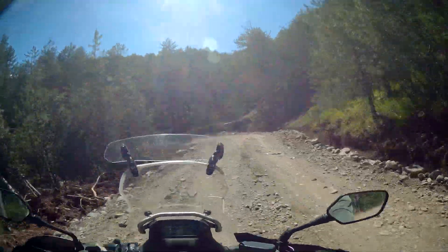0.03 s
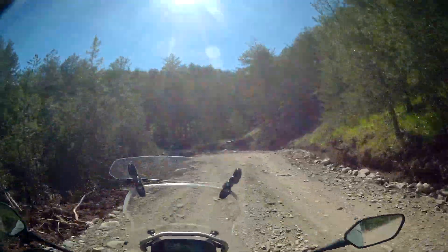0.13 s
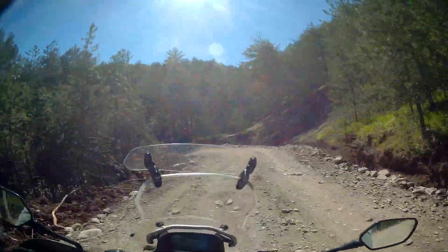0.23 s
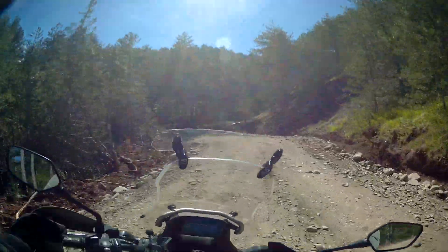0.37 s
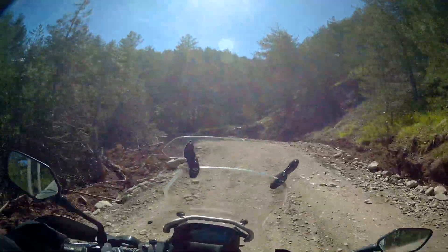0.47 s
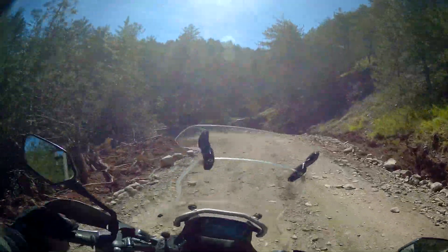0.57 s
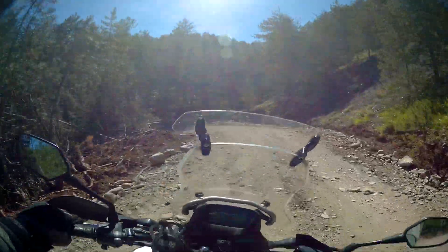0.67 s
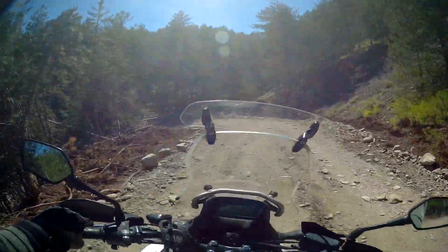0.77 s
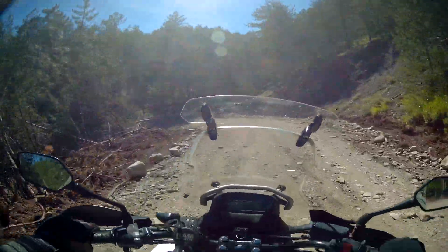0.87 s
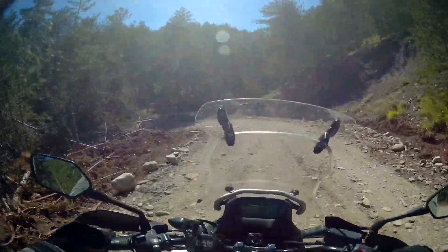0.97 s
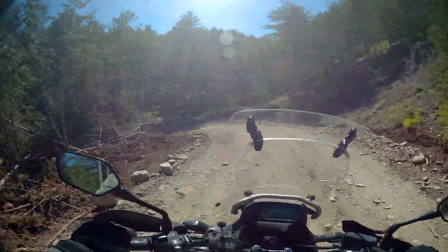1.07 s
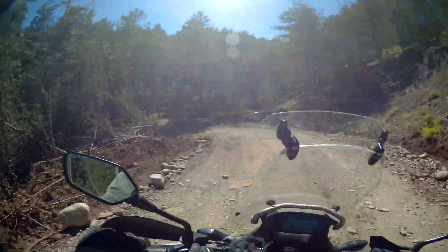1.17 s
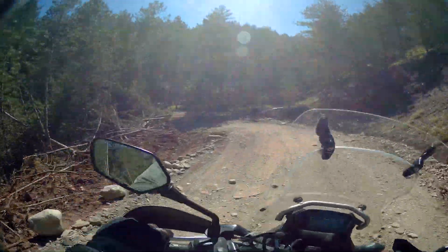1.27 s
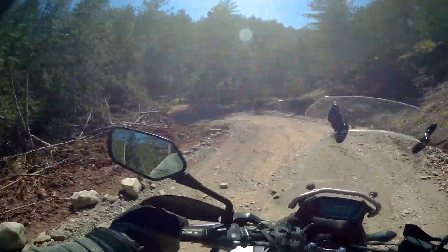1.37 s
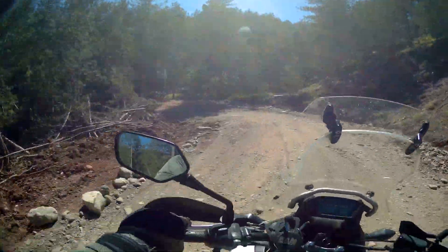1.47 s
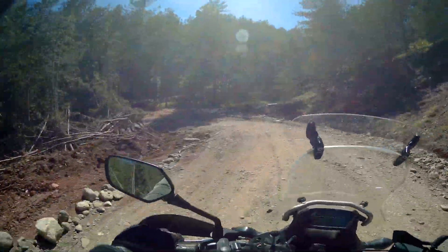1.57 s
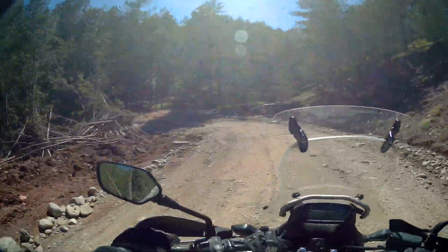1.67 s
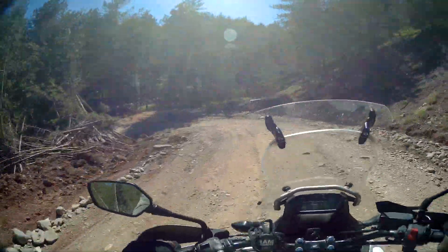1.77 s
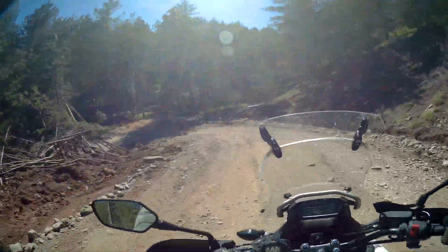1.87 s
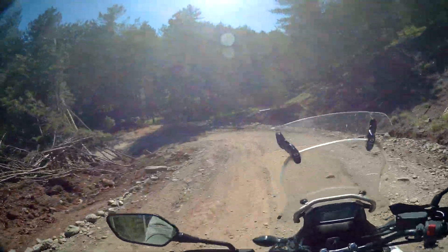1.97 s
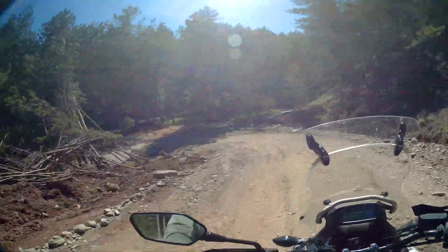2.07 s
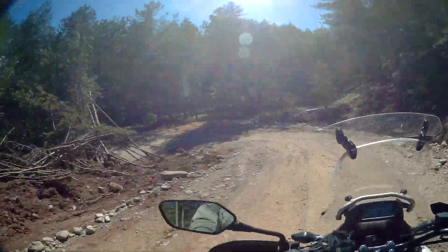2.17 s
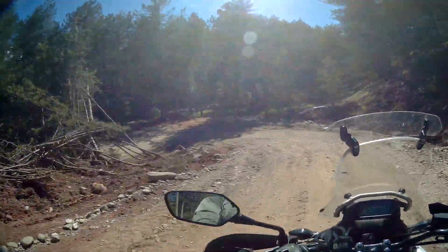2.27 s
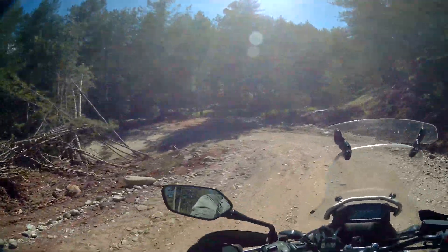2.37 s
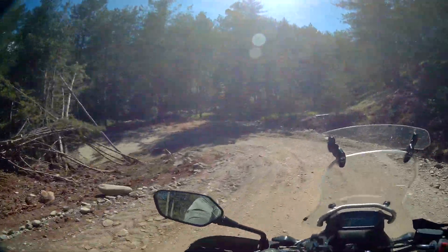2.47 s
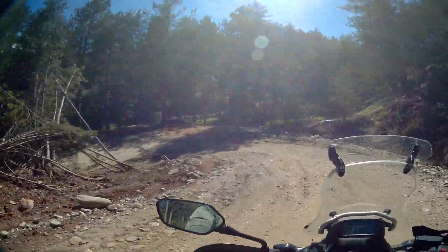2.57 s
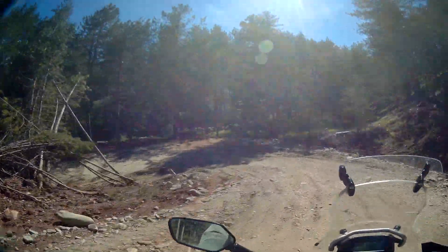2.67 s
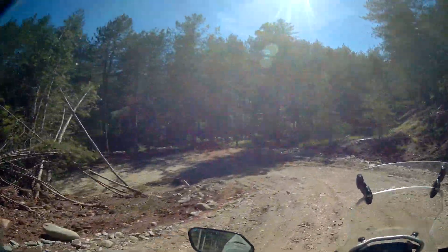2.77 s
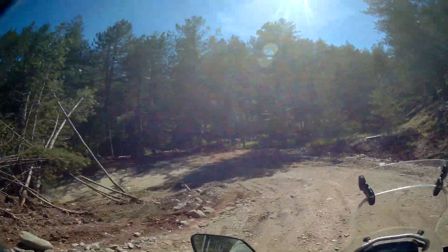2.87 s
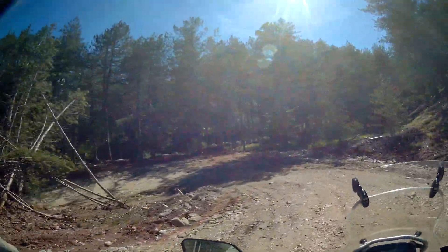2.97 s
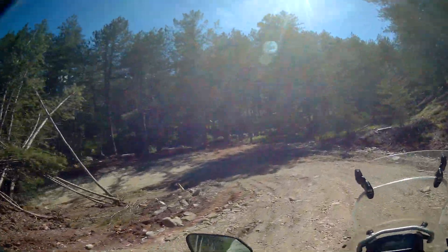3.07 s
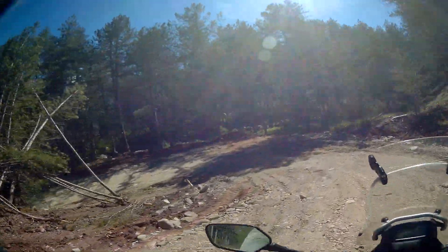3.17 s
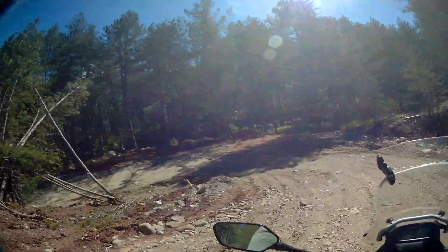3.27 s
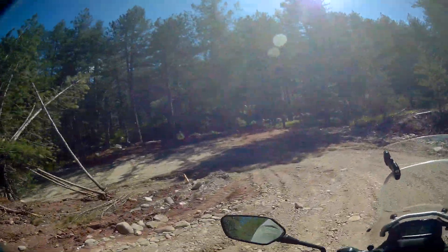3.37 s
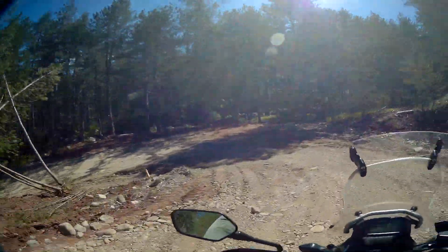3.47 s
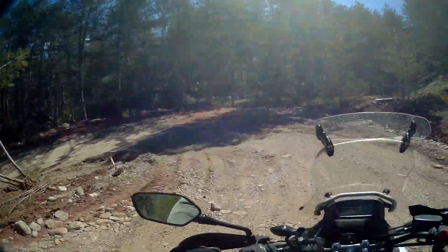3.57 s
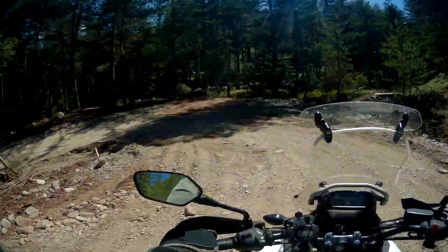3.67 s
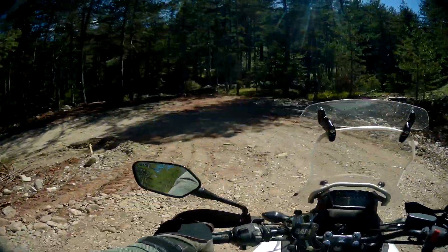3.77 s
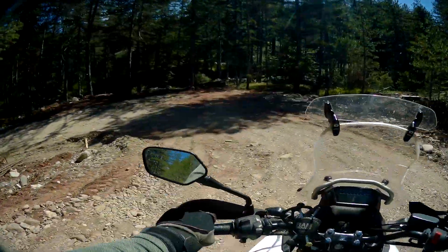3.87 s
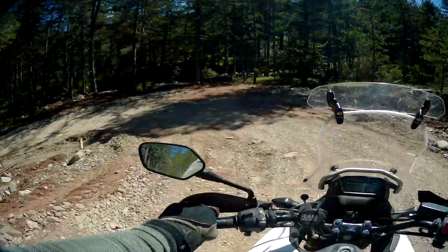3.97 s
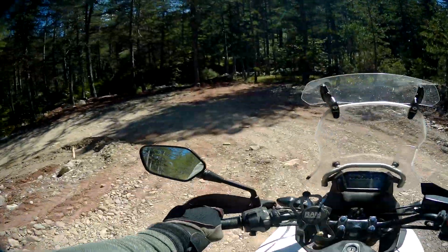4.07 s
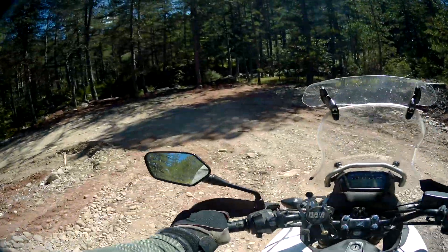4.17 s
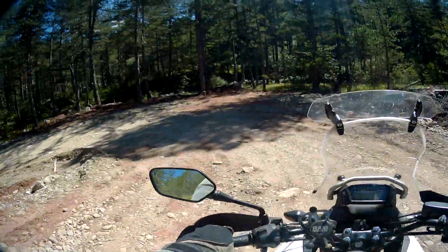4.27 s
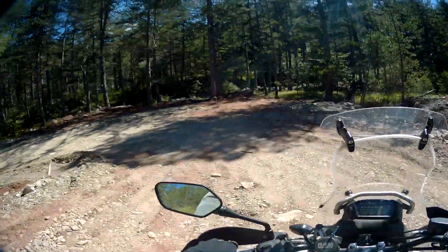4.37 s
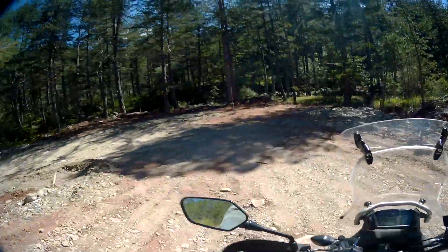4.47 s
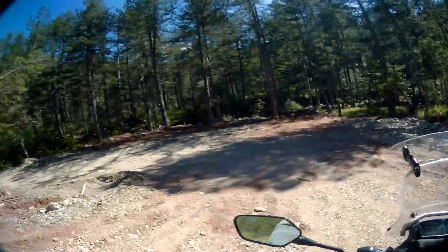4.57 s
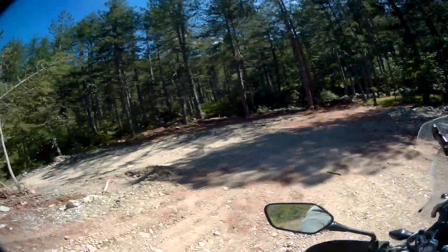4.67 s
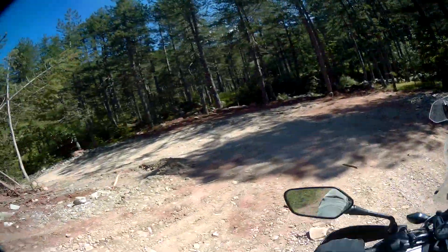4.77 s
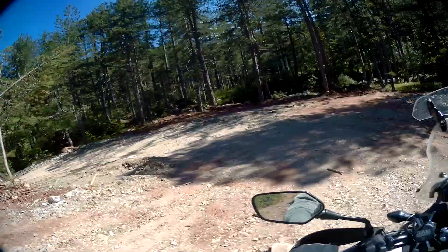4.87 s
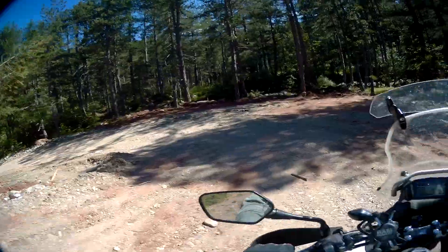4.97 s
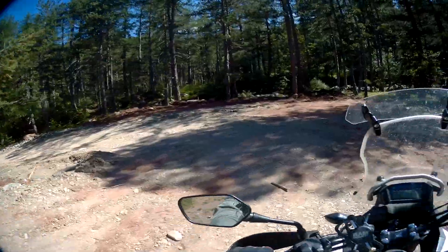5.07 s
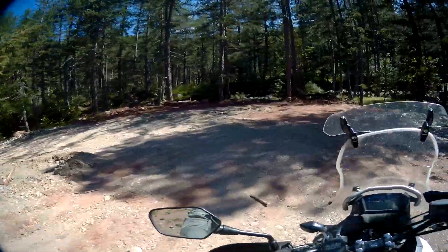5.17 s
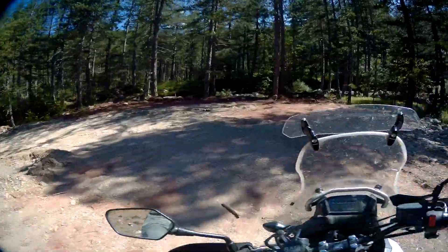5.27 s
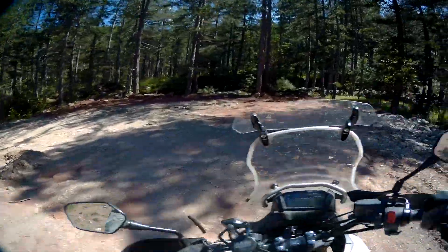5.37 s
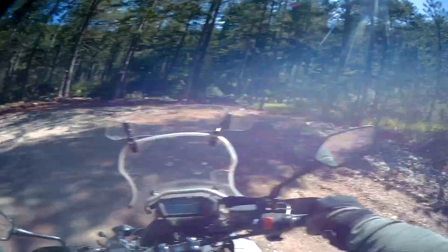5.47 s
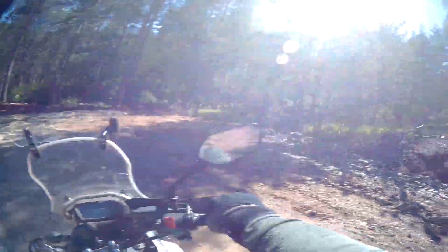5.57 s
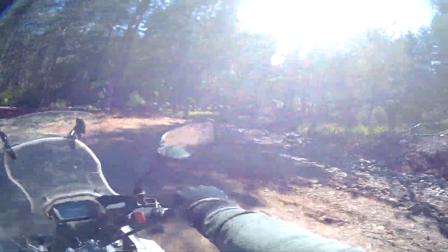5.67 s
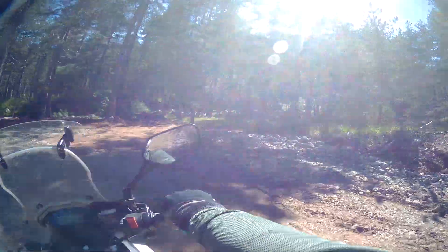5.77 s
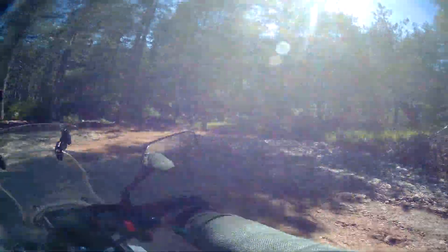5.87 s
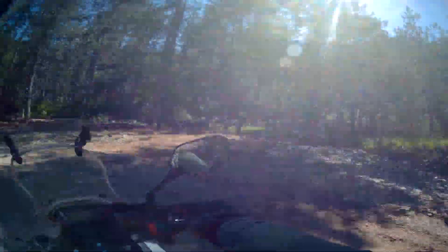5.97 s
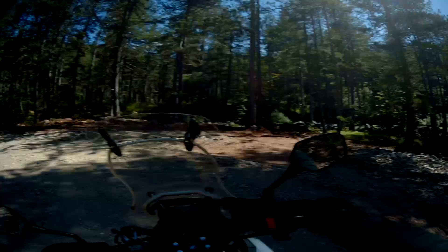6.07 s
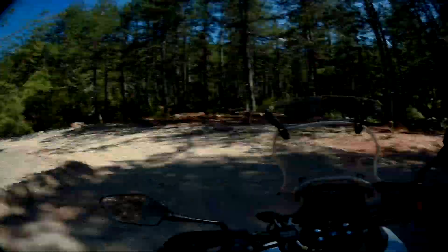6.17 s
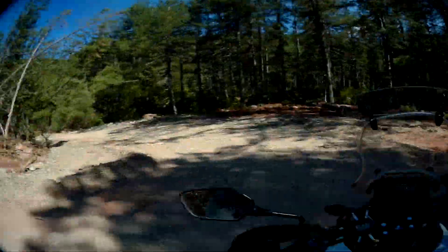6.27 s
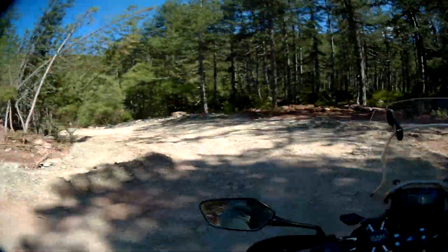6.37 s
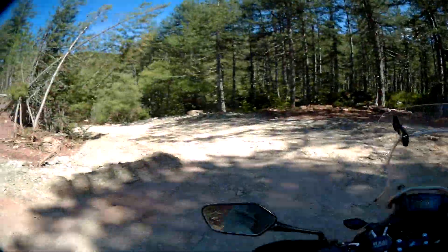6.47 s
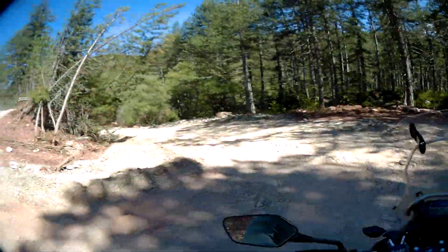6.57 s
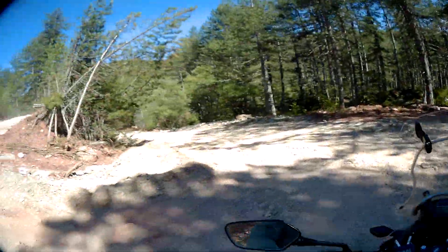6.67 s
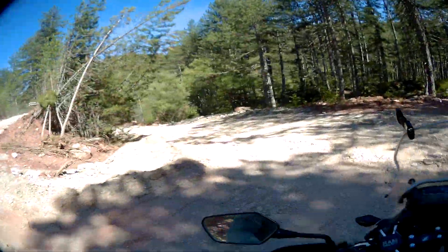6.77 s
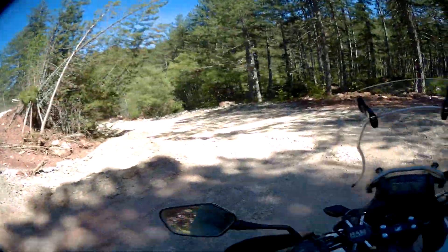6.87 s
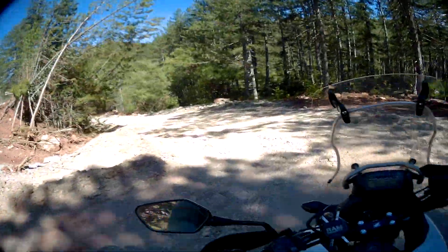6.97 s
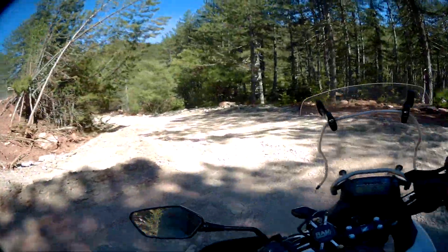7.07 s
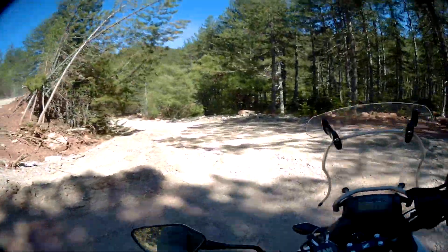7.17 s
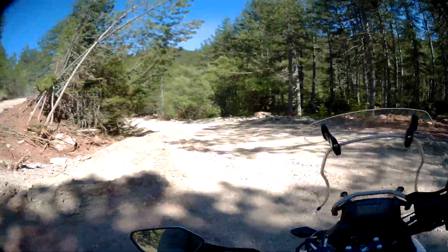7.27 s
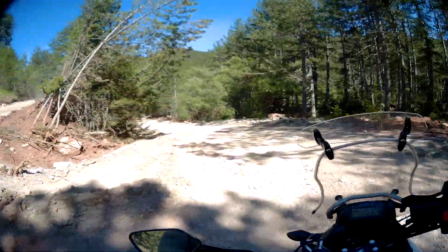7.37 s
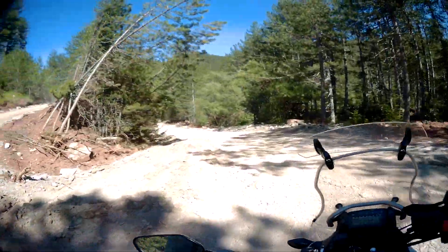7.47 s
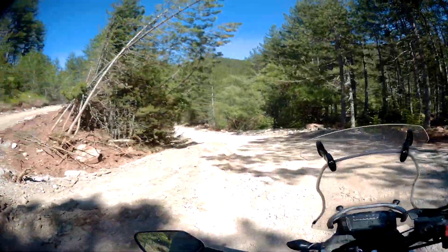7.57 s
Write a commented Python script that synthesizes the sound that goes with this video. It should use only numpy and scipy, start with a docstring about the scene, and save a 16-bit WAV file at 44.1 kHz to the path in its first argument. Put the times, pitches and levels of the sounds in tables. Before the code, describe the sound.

A close, dry, single-channel microphone rides on a motorcycle outdoors. First comes dense stony clatter: dull suspension knocks, sharp metallic stone hits, grit and pebble clicks over a low, fluttering exhaust. Knocks grow sparse and the engine note sinks into uneven separate chugs with soft mechanical ticking and thin whining. Near idle, it becomes quiet, then the engine picks up smoothly and pulls away.

```python
"""A twin-cylinder motorcycle coasts over stony ground, slows to near idle, then opens up and pulls away.
Uneven pairs of firings click into resonant exhaust filters over a harmonic pumping series; noise bursts
sputter, gulp and clatter with the cycle. Random grains make tyre rumble, gravel crunch and pebble clicks.
Timed bursts and short rings make jolts, flung stones, chips and pops; resonated noise makes thin whines
and two brief stone rings. The mix is cut above 15.2 kHz."""
import sys
import numpy as np
from scipy import signal
from scipy.fft import rfft, irfft
from scipy.io import wavfile
from scipy.ndimage import uniform_filter1d

SR = 44100
rng = np.random.default_rng(int(sys.argv[2]) if len(sys.argv) > 2 else 0)


def materialize(psi):
    """Save the field psi as 16-bit PCM at rate SR to the path in sys.argv[1].

    A 1-D psi becomes a single channel; in a 2-D psi each row is a channel.
    """
    bounded = np.clip(np.atleast_2d(psi).T, -1, 1)
    quanta = np.round(bounded * 32767).astype(np.int16)
    wavfile.write(sys.argv[1], SR, quanta)


N = 336483
TIME = np.arange(N) / SR
FIRING_GAP = 3 / 8  # cycles; second cylinder fires 270 crank degrees after the first
OPEN_S = 6.748  # throttle snaps open
CRUISE_RATE_HZ = 20  # reference engine cycle rate
WHINE_WOBBLE_HZ, WHINE_THROB_DB = 25, 4


def amp(db):
    """Decibels to gain."""
    return 10 ** (np.asarray(db) / 20)


def unit(x):
    """Scale to rms 1."""
    return x / np.sqrt(np.mean(x ** 2) + 1e-20)


def curves(rows):
    """Table columns after the first, interpolated linearly in time."""
    s, *columns = np.transpose(rows)
    return [np.interp(TIME, s, column) for column in columns]


def add(mix, s, sound):
    """Mix a sound in at time s."""
    part = mix[max(round(s * SR), 0):][:len(sound)]
    part += sound[:len(part)]


def colour(x, points, size=8192):
    """Causal minimum-phase filter with the given spectrum, unit energy: white noise keeps its level."""
    hz, db = np.transpose(points)
    bin_hz = abs(np.fft.fftfreq(size, 1 / SR))
    log_gain = np.log(amp(np.interp(np.log(bin_hz + 1), np.log(hz), db)))
    spectrum = np.exp(np.conj(signal.hilbert(log_gain)))
    ring = np.fft.ifft(spectrum).real[:size // 2]
    return signal.oaconvolve(x, ring / np.linalg.norm(ring))[:N]


def wander(bandwidth_hz):
    """Slow random drift of rms 1: Gaussian low-passed noise."""
    spectrum = rfft(rng.standard_normal(N))
    rolloff = np.exp(-(np.fft.rfftfreq(N, 1 / SR) / bandwidth_hz) ** 2)
    return unit(irfft(spectrum * rolloff, N))


def resonate(x, hz, width_hz):
    """Double-pole resonance at a fixed or moving frequency, rms 1: shift to 0 Hz, filter, shift back."""
    turn = np.exp(2j * np.pi * np.cumsum(hz * np.ones(N)) / SR)
    r = np.exp(-np.pi * width_hz / SR)
    baseband = signal.lfilter([1], [1, -2 * r, r * r], x / turn + 1e-18)
    return unit((turn * baseband).real)


def puffs(clicks, decay_s):
    """Turn each click into a noise puff of equal energy, its power decaying over decay_s."""
    r = np.exp(-1 / (decay_s * SR))
    power = signal.lfilter([1 - r], [1, -r], clicks ** 2)
    return np.sqrt(power) * rng.standard_normal(N)


def grains(per_s, spread_db):
    """Random clicks of rms 1, most small and a few large."""
    size = amp(spread_db * np.minimum(rng.exponential(1, N), 4))
    sign = rng.choice([-1, 1], N)
    return unit(size * sign * (rng.random(N) < per_s / SR))


def thud(swell_s):
    """Time and envelope of a dull blow that peaks after swell_s."""
    t = np.arange(SR // 15) / SR
    return t, (t / swell_s) ** 2 * np.exp(2 - 2 * t / swell_s)


# engine speed: t/s, four-stroke cycle rate/Hz
ENGINE_SPEED = [(0.0, 25.61), (0.81, 24.19), (1.06, 22.42), (1.61, 20.74), (2.86, 18.99), (3.69, 16.39),
                (3.88, 15.59), (4.54, 13.63), (5.47, 11.65), (5.62, 13.24), (5.84, 10.27), (6.26, 11.64),
                (6.7, 9.44), (6.85, 13.76), (6.98, 13.17), (7.28, 16.23), (7.45, 14.13), (7.63, 17.19)]


def cycles(lead_s=0):
    """Engine cycles completed: integrated speed, looking lead_s ahead."""
    speed_hz, = curves(ENGINE_SPEED)
    return np.cumsum(speed_hz) / SR + lead_s * speed_hz


def strokes(angle, uneven_db, late_s=0):
    """One click per cycle near the given share of the cycle, 3 ms early; mean power 1 before unevenness."""
    whole = np.maximum.accumulate(np.floor(cycles(lead_s=.003 - late_s) - angle))
    at = np.diff(whole, append=whole[-1]) > 0
    speed_hz, = curves(ENGINE_SPEED)
    return at * np.sqrt(SR / speed_hz) * amp(uneven_db * rng.standard_normal(N))


# pipe resonances sink to this share of their pitch as the gas cools at idle
COOL_PITCH, COOL_RATE_HZ, WARM_RATE_HZ = .92, 12.3, 13.6


def pipe(x, points):
    """Coasting pipe: crossfades to lower resonances at low speed as the gas cools."""
    warm = np.interp(curves(ENGINE_SPEED)[0], [COOL_RATE_HZ, WARM_RATE_HZ], [0, 1])
    cool_points = [(hz * COOL_PITCH, db) for hz, db in points]
    return colour(warm * x, points) + colour((1 - warm) * x, cool_points)


# throttle drive while pulling, before the layer offsets: t/s, level/dB
THROTTLE_DRIVE = [(6.76, -29.5), (6.85, -28), (6.93, -35), (7.14, -28), (7.41, -33), (7.47, -28),
                  (7.6, -23.5)]
# coasting levels at CRUISE_RATE_HZ, before the trims in exhaust(), and their growth with speed
PUMP_DB, BOOM_DB, BARK_DB = -29.5, -29.5, -28.5
PUMP_DB_PER_OCTAVE, BOOM_DB_PER_OCTAVE, BARK_DB_PER_OCTAVE = 4, 13.5, 17
BARK_TOP_OCTAVES = 0.048  # bark stops growing this far above CRUISE_RATE_HZ
# extra loss per octave below IDLE_RATE_HZ
IDLE_RATE_HZ, IDLE_PUMP_DB, IDLE_BOOM_DB, IDLE_BARK_DB = 16.7, 28.5, 7, 4
PICKUP_DB, FULL_PICKUP_HZ_PER_S = 13, 20.4  # firings harden as the engine speeds up
SETTLE_S = 0.008  # averaging window of the levels


def exhaust_levels(pulling_pump_db, pulling_boom_db, pulling_bark_db):
    """Pump, boom and bark levels: set by engine speed when coasting, by throttle when pulling."""
    speed_hz, = curves(ENGINE_SPEED)
    throttle_db, = curves(THROTTLE_DRIVE)
    octaves = np.log2(speed_hz / CRUISE_RATE_HZ)
    bark_octaves = np.minimum(octaves, BARK_TOP_OCTAVES)
    idling = np.maximum(np.log2(IDLE_RATE_HZ / speed_hz), 0)
    acceleration = np.gradient(speed_hz) * SR
    pickup_db = PICKUP_DB * np.clip(acceleration / FULL_PICKUP_HZ_PER_S, 0, 1)
    coasting = [PUMP_DB + PUMP_DB_PER_OCTAVE * octaves - IDLE_PUMP_DB * idling,
                BOOM_DB + BOOM_DB_PER_OCTAVE * octaves - IDLE_BOOM_DB * idling + pickup_db,
                BARK_DB + BARK_DB_PER_OCTAVE * bark_octaves - IDLE_BARK_DB * idling + pickup_db]
    pulling = [throttle_db + pulling_pump_db,
               throttle_db + pulling_boom_db,
               throttle_db + pulling_bark_db]
    return uniform_filter1d(np.where(TIME > OPEN_S, pulling, coasting), round(SETTLE_S * SR))


# coasting firings made louder or softer: t/s, level change/dB
FIRING_CHANGES = [(3.758, 2.5), (3.95, -1), (4.02, -2), (4.08, 8.5), (4.21, 1), (4.29, 4), (4.425, 13),
                  (4.57, 9.5), (5.028, 5), (5.447, 11.5)]
# pumping of two pistons 270 degrees apart: multiple of the cycle rate, relative level/dB
PUMP_ORDERS = [(2, -7.5), (3, 2.5), (4, -25.5), (5, -9.5), (6, -24.5)]
# silencer response: f/Hz, relative level/dB
SILENCER_BOOM = [(30, -32), (65, -0.5), (105, 13.5), (130, 7), (170, -2.5), (230, 1.5), (400, -84.5)]
# pipe response, coasting: f/Hz, relative level/dB
COASTING_BARK = [(120, -48.5), (225, -2.5), (265, -9.5), (300, 5.5), (350, 3), (400, -2), (470, -2),
                 (520, -12), (600, -24), (750, -33), (1000, -46), (2000, -93)]
# pipe response, throttle open: f/Hz, relative level/dB
PULLING_BARK = [(120, -47), (215, -0.5), (270, 0), (300, 7.5), (320, 8), (345, 6), (365, -5.5), (400, 0),
                (450, -9.5), (500, -8), (600, -33.5), (1000, -63.5), (2000, -94.5)]
JITTER_S = .00025  # rms firing jitter, coasting
# pumping orders swell as they glide through the silencer's resonance
HUM_HZ, HUM_WIDTH_HZ, HUM_DB = 114.2, 15, 10


def exhaust(first_db, pulling_first_db):
    """Paired gas pulses drive silencer and pipe; coasting, the first of a pair is weak and ragged."""
    pulling = TIME > OPEN_S
    pump_db, boom_db, bark_db = exhaust_levels(
        pulling_pump_db=-13.0, pulling_boom_db=3.5, pulling_bark_db=1.56)
    firing_gain = amp(sum(db * (abs(TIME - s) < .012) for s, db in FIRING_CHANGES))
    uneven_db = np.where(pulling, .5, 1)
    late_s = JITTER_S * wander(20) * ~pulling
    first_gain = amp(np.where(pulling, pulling_first_db, first_db))
    first = strokes(.5 - FIRING_GAP, uneven_db, late_s) * first_gain
    second = strokes(.5, uneven_db, late_s)
    ragged = puffs(.45 * first, .006) + puffs(.2 * second, .006)
    shut = ~pulling * (firing_gain * (.65 * first + second) + np.sqrt(firing_gain) * ragged)
    firm = first + second + .12 * ragged
    # pistons displace gas regularly, however well the charge burns
    turns = 2 * np.pi * (cycles(lead_s=-0.0018) - .5)
    speed_hz, = curves(ENGINE_SPEED)
    pumping = np.zeros(N)
    for order, db in PUMP_ORDERS:
        hum_db = HUM_DB * np.exp(-((order * speed_hz - HUM_HZ) / HUM_WIDTH_HZ) ** 2)
        pumping += amp(db + hum_db) * np.cos(round(order) * turns)
    # tailpipe radiates the slowest swings poorly
    tailpipe = signal.butter(2, [24, 220], "band", fs=SR, output="sos")
    pump = signal.sosfilt(tailpipe, amp(pump_db) * pumping)
    # silencer swells 3.4 ms ahead of the bark
    boom = amp(boom_db - 6.5) * colour(np.roll(firm, -round(0.0034 * SR)), SILENCER_BOOM)
    barking = pipe(shut, COASTING_BARK) + colour(pulling * firm, PULLING_BARK)
    bark = amp(bark_db - 3.5) * barking
    return pump - boom - bark


# indrawn air: f/Hz, relative level/dB
INTAKE_SPECTRUM = [(25, -23), (55, 11.5), (72, 0), (95, -11), (122, -2.5), (180, -28.5), (280, -1.5),
                   (330, 0), (450, -14), (800, -66.5)]


def intake(db):
    """Two soft gulps of air per cycle, one per cylinder, between the firings."""
    gulps = strokes(.28, 1) + strokes(.28 - FIRING_GAP, 1)
    return amp(db) * colour(gulps, INTAKE_SPECTRUM)


# sputtering gas, coasting: f/Hz, relative level/dB
BURBLE_SPECTRUM = [(150, -34.5), (250, -5.5), (305, 1), (350, 3), (420, -5.5), (490, -2), (580, -17.5),
                   (750, -31), (1100, -49), (2000, -88)]


def burble(db, db_per_octave, first_angle, second_angle, second_db, share):
    """Throttle shut, gas sputters as each exhaust valve opens: Gaussian gates, sigma = share of a cycle."""
    speed_hz, = curves(ENGINE_SPEED)
    turns = cycles()
    gates = []
    for angle in (first_angle, second_angle):
        offset = (turns - angle + .5) % 1 - .5
        gates.append(np.exp(-.5 * (offset / share) ** 2))
    octaves = np.minimum(np.log2(speed_hz / CRUISE_RATE_HZ), 0)
    level = amp(db + db_per_octave * octaves) * (TIME < OPEN_S)
    gas = pipe(rng.standard_normal(N), BURBLE_SPECTRUM)
    return level * (gates[0] + amp(second_db) * gates[1]) * gas


# peak of the second cylinder's thump: t/s, level/dB
CHUG_LEVEL = [(3.6, -46), (3.82, -34), (3.95, -31), (4.35, -26), (4.6, -36), (4.9, -40), (5.1, -25.5),
              (5.2, -51), (5.6, -50)]


def chug(hz, width_s):
    """The second cylinder's burn as a round, deep thump: a Gaussian-windowed cosine each cycle."""
    level_db, = curves(CHUG_LEVEL)
    age_s = (cycles() % 1 - .5) / curves(ENGINE_SPEED)[0]
    return amp(level_db) * np.exp(-.5 * (age_s / width_s) ** 2) * np.cos(2 * np.pi * hz * age_s)


# valve tick position: t/s, share of the cycle
TICK_PHASE = [(4.9, -.28), (5.6, -.02), (6.5, 0), (6.8, -.14)]
# gear and chain clatter: f/Hz, relative level/dB
CLATTER_SPECTRUM = [(500, 1.5), (900, 4.5), (1250, -2.5), (1550, -3.5), (2050, -7), (2600, -8.5),
                    (3350, -0.5), (3900, -12), (4600, -17), (7000, -18), (10000, -24.5), (15000, -27)]
TICK_HZ, TICK_WIDTH_HZ, TICK_WAVER_HZ = 3950, 750, 60  # waver is rms


def valves(tick_db, hiss_db, throb_db, load_db):
    """Valve gear ticks, one cylinder louder, amid rattle; gears and chain clatter, harder under load."""
    angle, = curves(TICK_PHASE)
    pulling = TIME > OPEN_S
    taps = strokes(angle, .6) + .25 * strokes(angle - FIRING_GAP, 1) + .15 * grains(200, 1)
    tick_hz = TICK_HZ + TICK_WAVER_HZ * wander(8)
    # ticks take half the load gain
    tick_gain = amp(tick_db + load_db / 2 * pulling)
    tick = tick_gain * resonate(puffs(taps, 0.0048), tick_hz, TICK_WIDTH_HZ)
    beats = strokes(.5 - FIRING_GAP, 0.94) + strokes(0.26, 0.98)
    throb = unit(puffs(beats, 0.012)) * amp(throb_db + load_db * pulling)
    hiss = amp(hiss_db) * rng.standard_normal(N)
    return tick + colour(hiss + throb, CLATTER_SPECTRUM)


# gravel shift under the tyres: t/s, level/dB (used relative to its mean or maximum)
GRAVEL_SHIFT = [(0.06, -48.5), (0.25, -50), (0.45, -53), (0.62, -48.5), (0.95, -52), (1.43, -57),
                (2.11, -59), (2.5, -59), (2.75, -63), (3.21, -65), (3.93, -62.5), (4.54, -68), (5.94, -68),
                (6.67, -70), (7.3, -67.5), (7.6, -60)]
# rolling tyres: f/Hz, relative level/dB
TYRE_SPECTRUM = [(20, -19), (50, 6.5), (115, -0.5), (170, -11.5), (220, -11), (300, -4.5), (400, 1),
                 (490, 4), (570, -4.5), (700, -14.5), (900, -25.5), (1300, -52), (3000, -81.5)]
# crunching gravel: f/Hz, relative level/dB
CRUNCH_SPECTRUM = [(400, -13.5), (800, 3.5), (1150, 3), (1650, 2.5), (2050, -5), (2500, -7), (3350, -4.5),
                   (3900, -11), (4700, -23), (7000, -41.5), (12000, -51.5), (16000, -59)]
# fine grit: f/Hz, relative level/dB
GRIT_SPECTRUM = [(2500, -26.5), (4500, 1), (6000, 6), (6950, 6), (7700, -6), (8700, 1.5), (9700, -7.5),
                 (11800, -9), (12900, -15.5), (15000, -21)]
SPRAY_S = 0.018  # grit spray peaks this long after a flung stone


def tyres(rumble_db, rumble_growth, crunch_db, crunch_growth, grit_db, grit_growth, spray_db, clump_db):
    """Stones thump tyres, grind and spray grit, in uneven clumps; each grows at its own rate with shift."""
    shift_db, = curves(GRAVEL_SHIFT)
    shifting_db = shift_db - shift_db.mean()
    clumps_db = clump_db * wander(20)
    rolling_gain = amp(rumble_db + rumble_growth * shifting_db + clumps_db)
    rolling = colour(grains(1100, 2.1), TYRE_SPECTRUM) * rolling_gain
    contacts = .75 * grains(1000, 4) + .65 * rng.standard_normal(N)
    grinding_gain = amp(crunch_db + crunch_growth * shifting_db + clumps_db)
    grinding = colour(contacts, CRUNCH_SPECTRUM) * grinding_gain
    # steady grit plus a burst after each flung stone
    flying = amp(grit_db + grit_growth * shifting_db)
    age = np.arange(SR // 5) / SR / SPRAY_S
    for s, _, _, thrown_db in FLUNG_STONES:
        add(flying, s, amp(thrown_db + spray_db) * age * np.exp(1 - age))
    spray = colour(puffs(grains(700, 4), 0.0014), GRIT_SPECTRUM) * flying * amp(clumps_db)
    return rolling + grinding + spray


# frame on the roughest ground: f/Hz, relative level/dB
DRUMMING_SPECTRUM = [(20, -6.5), (70, -8), (150, -0.5), (200, -1.5), (260, -17.5), (400, -35.5), (800, -78)]


def drumming(db, growth):
    """Suspension hammers the frame on coarse stones: random clicks, falling with the gravel shift."""
    shift_db, = curves(GRAVEL_SHIFT)
    hammering = colour(grains(300, 0.83), DRUMMING_SPECTRUM)
    return hammering * amp(db + growth * (shift_db - shift_db.max()))


def pebbles(db, growth, per_s, ring_db):
    """Pebbles snap together: random dry clicks, each with a short ring at one of eight pitches."""
    shift_db, = curves(GRAVEL_SHIFT)
    t = np.arange(SR // 50) / SR
    out = np.zeros(N)
    for hz in np.geomspace(1200, 3700, 8):
        hits = (rng.random(N) < per_s / 8 / SR) * amp(3 * rng.standard_normal(N))
        ring = np.exp(-t / .003) * np.sin(2 * np.pi * hz * t)
        snap = np.exp(-t / .001) * rng.standard_normal(len(t))
        out += signal.oaconvolve(hits, snap + amp(ring_db) * ring)[:N]
    return colour(out, CRUNCH_SPECTRUM) * amp(db + growth * (shift_db - shift_db.max()))


# chassis jolts: t/s, knock level/dB before gain, ring f/Hz, scuff level/dB before filtering
CHASSIS_BUMPS = [(0.075, -28, 560, -43), (0.153, -9, 343, -35), (0.215, -8, 475, -31),
                 (0.255, -5, 330, -39), (0.293, -12.5, 423, -37), (0.316, -19, 512, -33.5),
                 (0.446, -9.5, 348, -51), (0.517, -15, 528, -39), (0.597, -9.5, 453, -35),
                 (0.655, -11.5, 142, -34.5), (0.803, -16.5, 505, -39.5), (0.908, -9.5, 424, -34.5),
                 (1.077, -14.5, 510, -42.5), (1.25, -15, 500, -37), (1.324, -10, 453, -36.5),
                 (1.352, -15, 480, -47), (1.496, -25, 550, -41), (2.064, -27, 545, -46.5),
                 (2.128, -33, 547, -50), (2.276, -25, 580, -57), (2.327, -17.5, 130, -45),
                 (2.431, -9, 484, -37.5), (2.484, -18.5, 530, -51), (2.536, -11.5, 152, -53),
                 (2.559, -17, 282, -41.5), (2.744, -31, 615, -46.5), (2.9, -29, 656, -51),
                 (3.478, -14.5, 292, -38), (3.583, -30, 550, -53.5), (3.73, -25, 494, -58),
                 (4.321, -23.5, 428, -46.5), (4.602, -22.5, 472, -49), (4.965, -36.5, 660, -53),
                 (6.181, -23, 118, -51)]
# tyre scuffing over a rock: f/Hz, relative level/dB
SCUFF_SPECTRUM = [(300, -6), (700, 0), (1000, -7), (1600, -20), (3000, -40), (6000, -70)]


def bumps(db, swell_s, scuff_swell_s):
    """A rock jolts the suspension: a dull knock of a few cycles, plus the tyre's noise scuff."""
    t, shape = thud(swell_s)
    _, rub = thud(scuff_swell_s)
    knocks, scuffs = np.zeros((2, N))
    for s, peak_db, hz, scuff_db in CHASSIS_BUMPS:
        add(knocks, s, amp(peak_db + db) * shape * np.sin(2 * np.pi * hz * t))
        add(scuffs, s, amp(scuff_db) * rub * rng.standard_normal(len(t)))
    return knocks + colour(scuffs, SCUFF_SPECTRUM)


# stones flung at the bike: t/s, level/dB before gain, upper-ring offset/dB, grit level/dB before gain
FLUNG_STONES = [(0.0898, -48, -5, -85), (0.209, -43, -6.5, -67), (0.223, -48, -4, -73),
                (0.251, -47, 16, -76), (0.257, -35.5, -3, -81), (0.3188, -52, 17, -72.5),
                (0.374, -48.5, -9, -69.5), (0.519, -49.5, -9, -83), (0.5536, -52, 10, -79),
                (0.596, -43.5, -3, -72), (0.643, -51, -3, -77.5), (0.6666, -52, -6, -81),
                (0.826, -44, -11, -64), (0.905, -54, -10, -73), (0.973, -45.5, -5, -77.5),
                (0.991, -48, -16, -83), (1.084, -51.5, -10, -79), (1.247, -43.5, -6, -73),
                (1.3167, -45, -13, -69), (1.383, -44, 4, -78), (1.616, -48, -32, -77),
                (1.815, -45.5, -18, -74), (1.912, -55.5, -30.5, -90), (2.141, -58, 20, -97),
                (2.9032, -51, -5, -99), (2.993, -62.5, -15.5, -99), (3.4798, -49.5, 1, -81),
                (3.856, -54.5, -10, -75), (3.927, -54, -25, -78), (4.319, -63.5, -14, -92),
                (4.6034, -75, -30, -100), (4.966, -62, -18, -91)]
# struck metal's modes: nominal f/Hz, relative level/dB, t60/s
METAL_MODES = [(1048, -1.5, 0.087), (1360, -7.5, 0.012), (1650, -5.5, 0.086), (1920, -13.5, 0.0073),
               (2280, -14, 0.08), (2814, -8.5, 0.028), (3300, -6.5, 0.025), (3540, -4.5, 0.017)]


def stones(db, upper_db, treble_db, crack_db):
    """Stones crack against metal, ring its modes differently at each spot, and shed dust."""
    t = np.arange(SR // 10) / SR
    hz, mode_db, t60_s = np.transpose(METAL_MODES)[:, :, None]
    swell = 1 - np.exp(-t / .002)
    scuff = swell * (np.exp(-t / .003) + .1 * np.exp(-t / .02))
    rings, cracks, dust = np.zeros((3, N))
    for s, peak_db, ring_db, thrown_db in FLUNG_STONES:
        # impact spot sets each mode's sign and detune (2 % rms)
        spot = rng.standard_normal((2, len(METAL_MODES), 1))
        level_db = mode_db + (hz > 2500) * (ring_db + upper_db) - 60 * t / t60_s
        mode_hz = hz * (1 + .02 * spot[1])
        modes = amp(level_db) * np.sign(spot[0]) * np.sin(2 * np.pi * mode_hz * t)
        ring = swell * modes.sum(0)
        burst = rng.standard_normal(len(t)) * scuff
        add(rings, s, amp(peak_db + db) * ring / abs(ring).max())
        add(cracks, s, amp(peak_db + crack_db) * burst)
        add(dust, s, amp(thrown_db + treble_db) * burst)
    return rings + colour(cracks, CRUNCH_SPECTRUM) + colour(dust, GRIT_SPECTRUM)


# small chips on the bodywork: t/s, level/dB before gain
CHIP_HITS = [(0.177, -63), (0.206, -61.5), (0.256, -67), (0.343, -64), (0.5572, -63.5), (0.5851, -64),
             (0.6101, -58.5), (0.634, -63), (0.6674, -62.5), (0.8181, -65), (0.8385, -65), (0.863, -63),
             (0.912, -65.5), (0.992, -64), (1.2735, -66), (1.3479, -64), (1.6397, -66), (1.831, -65)]


def chips(db, ring_db, decay_s):
    """Each chip: a short bright noise snap with a ring at its own random pitch."""
    t = np.arange(SR // 25) / SR
    shape = (1 - np.exp(-t / .0006)) * np.exp(-t / decay_s)
    snaps, rings = np.zeros((2, N))
    for s, peak_db in CHIP_HITS:
        hz = rng.uniform(6500, 9000)
        add(snaps, s, amp(peak_db + db) * shape * rng.standard_normal(len(t)))
        add(rings, s, amp(peak_db + ring_db) * shape * np.sin(2 * np.pi * hz * t))
    return colour(snaps, GRIT_SPECTRUM) + rings


# unburnt fuel popping while coasting: t/s, level/dB before low-pass, ring f/Hz
FUEL_POPS = [(0.194, -5, 458), (0.555, -5.5, 507), (1.663, -15.5, 325), (2.006, -8, 388), (2.205, -12, 346)]


def pops(swell_s):
    """Each fuel pop rings the pipe for a few cycles, low-passed at 750 Hz."""
    t, shape = thud(swell_s)
    out = np.zeros(N)
    for s, peak_db, hz in FUEL_POPS:
        add(out, s, amp(peak_db) * shape * np.sin(2 * np.pi * hz * t))
    return signal.sosfilt(signal.butter(4, 750, fs=SR, output="sos"), out)


# arching whine of the running gear: t/s, centre f/Hz, mean level/dB
SINGING_PATH = [(3.75, 3400, -100), (3.92, 3525, -78), (4.09, 3865, -78), (4.2, 3620, -81),
                (4.36, 3327, -79), (4.55, 3340, -75.5), (4.74, 3284, -71), (5.03, 3330, -83),
                (5.6, 3380, -85), (6.1, 3290, -88)]


def singing(width_hz):
    """One unbroken whine of resonated noise that flutters, and throbs as the engine shakes the bike."""
    hz, db = curves(SINGING_PATH)
    throb_db = WHINE_THROB_DB / 2 * np.sin(2 * np.pi * cycles())
    flutter_db = 1.8 * wander(40) + throb_db
    wobbling_hz = hz + WHINE_WOBBLE_HZ * wander(20)
    return amp(db + flutter_db) * resonate(rng.standard_normal(N), wobbling_hz, width_hz)


# thin whines, and two brief 1.67 kHz rings of flung stones:
# start t/s, length/s, level/dB before throb, start f/Hz, glide/(Hz/s), width/Hz
WHINES_AND_RINGS = [(3.772, 0.49, -73, 1600, 406, 345), (3.836, 0.035, -56, 1670, -3, 109),
                    (3.904, 0.066, -54.5, 1670, 5, 90), (6.718, 0.43, -76.5, 2280, -69.5, 260),
                    (7.005, 0.45, -70.5, 1520, 37, 249)]
WHINE_FLUTTER_DB = 1.5  # rms


def whines_and_rings():
    """Thin whines and brief stone rings: resonated noise swells, glides, fades, throbs at the cycle rate."""
    out = np.zeros(N)
    wobble_hz = WHINE_WOBBLE_HZ * wander(9.1)
    for s, length_s, db, hz, glide, width_hz in WHINES_AND_RINGS:
        age_s = np.clip(TIME - s, 0, length_s)
        swell = np.sin(np.pi * age_s / length_s) ** 2
        ring = resonate(rng.standard_normal(N), hz + glide * age_s + wobble_hz, width_hz)
        out += amp(db) * swell * ring
    throb_db = WHINE_THROB_DB * np.sin(2 * np.pi * cycles())
    return out * amp(WHINE_FLUTTER_DB * wander(25) + throb_db)


def scene():
    """Sum engine, whines and ground into one channel."""
    engine = exhaust(first_db=1, pulling_first_db=1) + intake(db=-49)
    engine += burble(db=-23.0, db_per_octave=30.5, first_angle=0.074, second_angle=0.467,
                     second_db=-2.0, share=.055)
    engine += chug(hz=97, width_s=0.0053) + pops(swell_s=0.0028)
    machine = valves(tick_db=-83.5, hiss_db=-69.0, throb_db=-85, load_db=8)
    machine += singing(width_hz=90)
    ground = tyres(rumble_db=-34.5, rumble_growth=0.97, crunch_db=-64.0, crunch_growth=0.86,
                   grit_db=-100, grit_growth=1.9, spray_db=-4.0, clump_db=1.3)
    ground += drumming(db=-28.0, growth=1.21)
    ground += pebbles(db=-51.5, growth=1.1, per_s=70, ring_db=-4.5)
    hits = bumps(db=-1.5, swell_s=0.003, scuff_swell_s=0.0055)
    hits += stones(db=3.5, upper_db=10.5, treble_db=0, crack_db=10.5)
    hits += chips(db=2.5, ring_db=2.5, decay_s=0.0055)
    return (engine + machine + ground + hits + whines_and_rings())[None]


EDGE_HZ = 15200


def record(dry):
    """Upper band limit: linear-phase low-pass."""
    lowpass = signal.firwin(511, EDGE_HZ, window=("kaiser", 9), fs=SR)
    return signal.oaconvolve(dry, lowpass[None], "same")


dry = scene()
out = record(dry)
materialize(out)
```